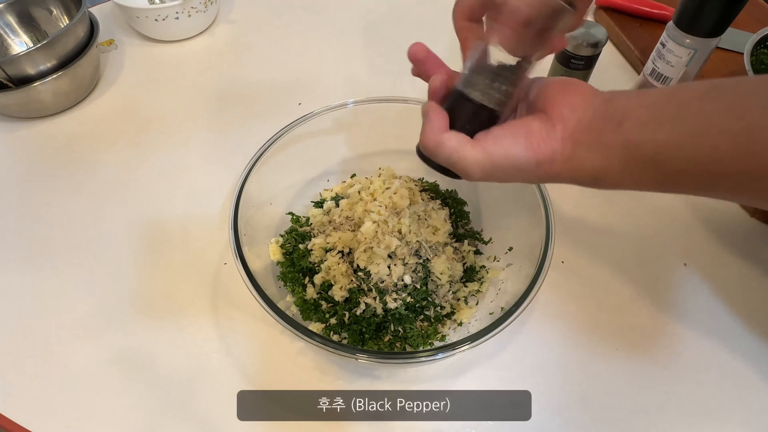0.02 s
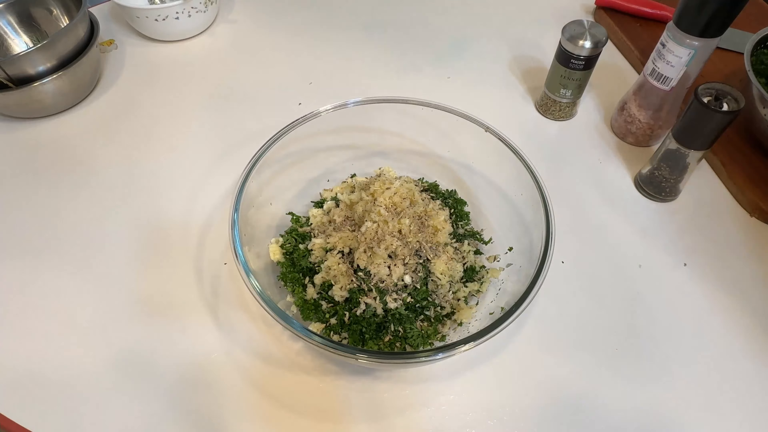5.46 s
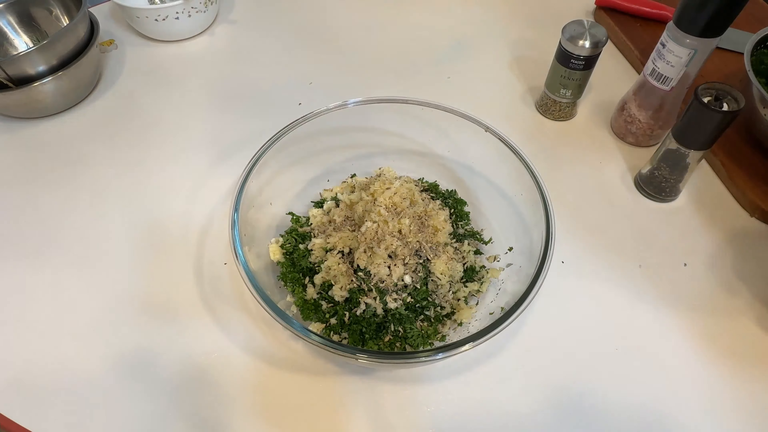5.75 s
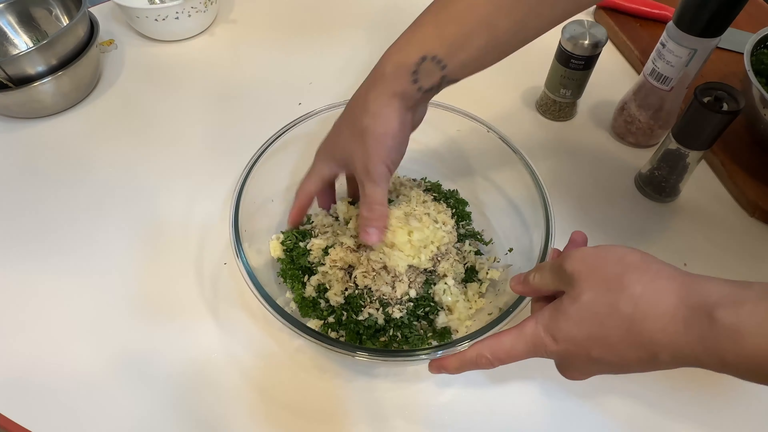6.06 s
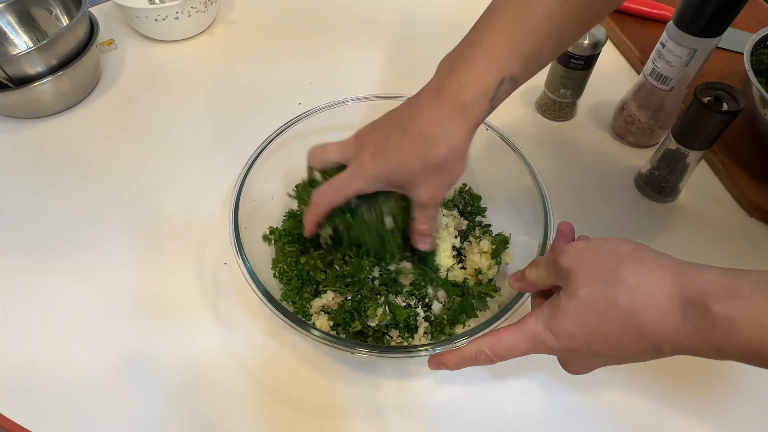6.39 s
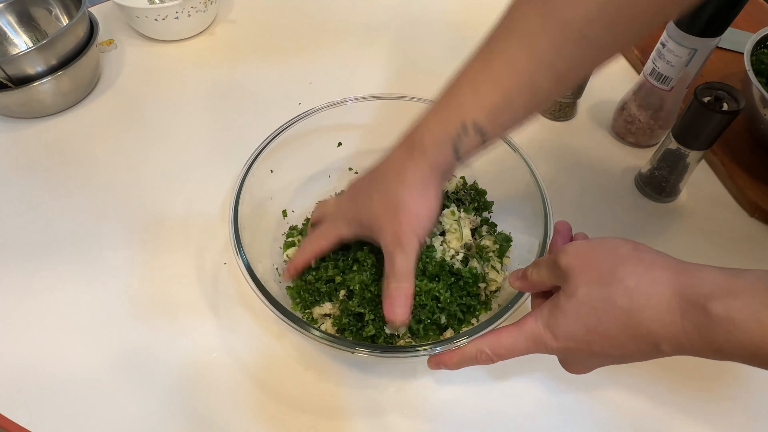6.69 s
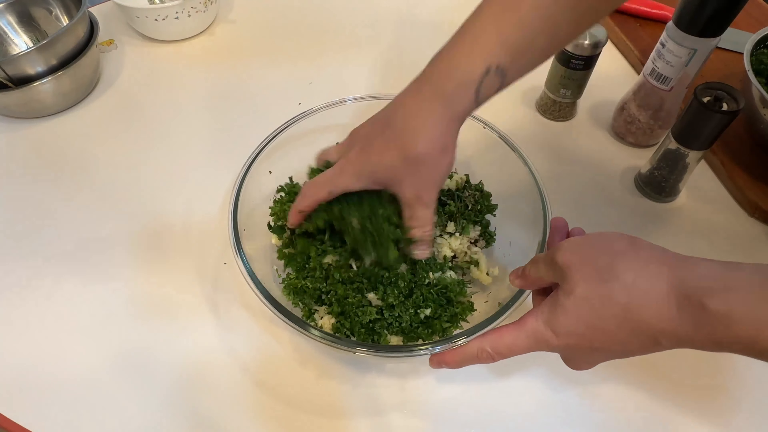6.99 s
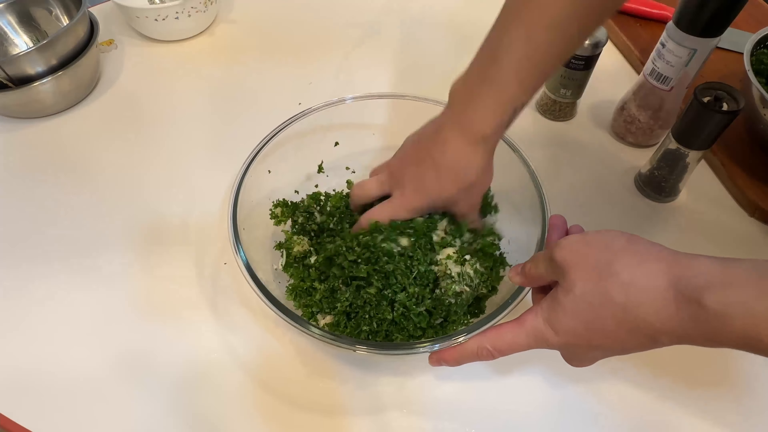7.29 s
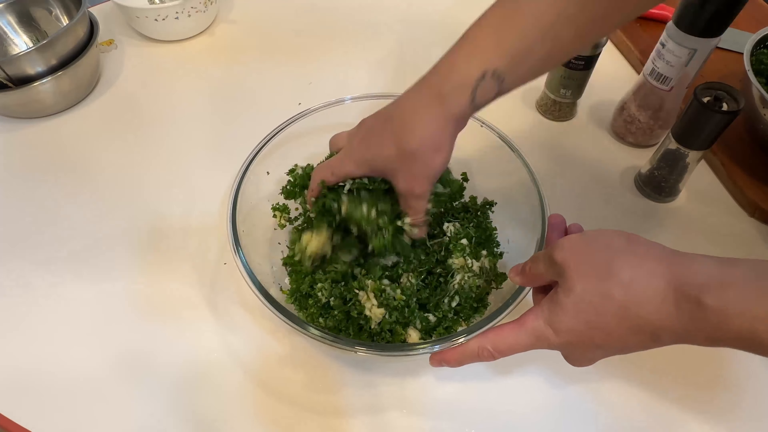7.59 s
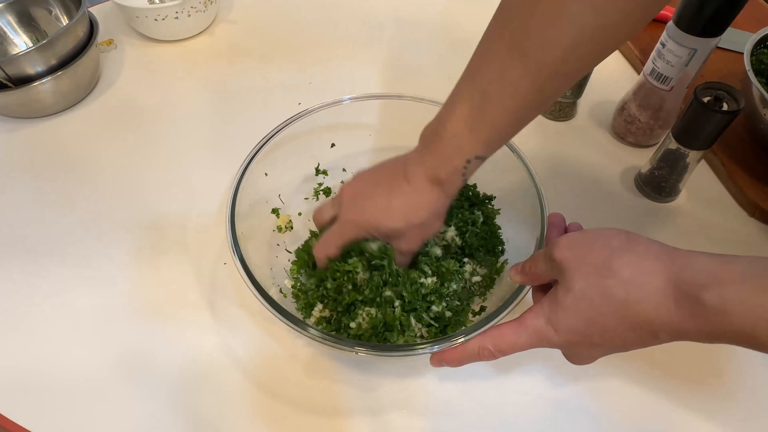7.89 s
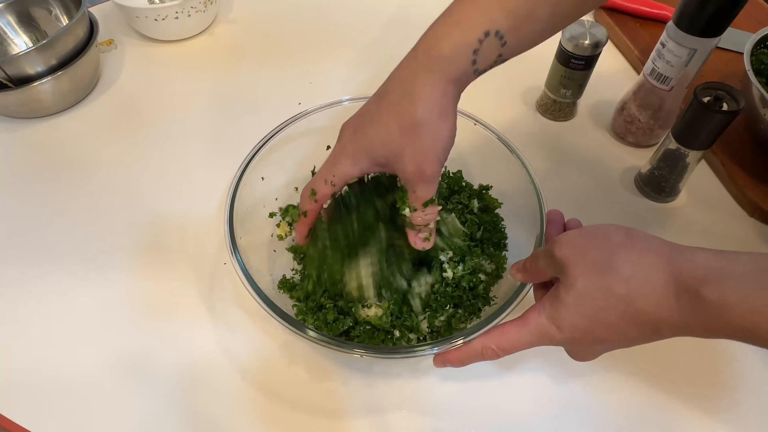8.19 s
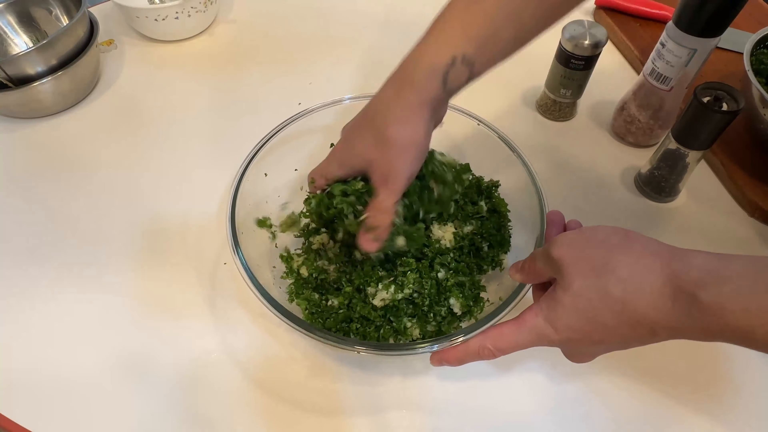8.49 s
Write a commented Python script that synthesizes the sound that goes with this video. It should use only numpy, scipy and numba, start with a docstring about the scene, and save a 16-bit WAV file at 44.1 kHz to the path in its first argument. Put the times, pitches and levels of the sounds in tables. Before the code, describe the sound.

Close to the microphone in a kitchen, a hand pepper mill is twisted rapidly to and fro, crunching and scraping with a high metallic ring. It stops about halfway and is set down with a dull knock. A glass bowl clinks lightly as a hand tosses chopped greens with a soft rustle. Dry crackles pop throughout over a low rumble and fine hiss.

```python
"""Pepper mill and salad in a kitchen

Close to a stereo microphone, a hand mill is twisted to and fro over a glass bowl, about nine times
a second: each twist crushes corns, the way back scrapes, and the burr rings high. The bowl clinks,
the mill is set down with a dull knock, then a hand tosses chopped greens in quick strokes.
All along, dead centre, dry crackles pop over a low rumble and a fine hiss, like a small fire."""
import sys
import numpy as np
from scipy import signal
from scipy.fft import rfft, irfft, next_fast_len
from scipy.io import wavfile
from scipy.ndimage import uniform_filter1d
from numba import njit

SR = 44100
rng = np.random.default_rng(int(sys.argv[2]) if len(sys.argv) > 2 else 0)


def write(x):
    x = np.atleast_2d(x).T
    wavfile.write(sys.argv[1], SR, np.round(np.clip(x, -1, 1) * 32767).astype(np.int16))


N = 384993
TIME = np.arange(N) / SR
BURR_HZ, TOP_HZ = 8530, 15850  # the burr's ring; the recorder's upper limit

# Levels are relative: each source adds its own gain.
# course of the room's rumble: t/s, level/dB
RUMBLE_LEVEL = [(0.0, -49), (6.0, -49.5), (6.75, -47.5), (7.15, -50.5), (8.73, -51)]
# spectra of the rumble and the hiss: f/Hz, level/dB
RUMBLE_SPECTRUM = [(20, -29), (45, -21), (65, -12.5), (88, 0), (125, -1.5), (180, -4), (250, -11),
                   (315, -10), (400, -17.5), (520, -18.5), (640, -24.5), (760, -22), (1300, -34.5),
                   (4000, -65)]
HISS_SPECTRUM = [(300, 4.5), (1500, 1), (5000, 2), (8000, 3), (11000, 4.8), (12900, 5.8), (13900, 7.8),
                 (16000, 5.5)]
# stereo width of room and mill at the microphone: f/Hz, side against mid/dB
ROOM_SIDE = [(25, 3), (90, -24), (250, -19.5), (1000, -16.5), (2500, -33.5)]
MILL_SIDE = [(150, 2), (500, 0), (9500, 0), (11500, -1.5), (16000, -1)]
# wrist strokes, each catching more or fewer corns: middle t/s, crunch/dB, scrape/dB
MILL_STROKES = [(0.067, -47.0, -44.5), (0.122, -45.5, -41.5), (0.184, -44, -46.5), (0.237, -44, -40.5),
                (0.285, -42.5, -48), (0.338, -46.5, -45), (0.384, -48, -46), (0.828, -67, -56),
                (0.897, -50, -40), (0.946, -49.5, -44), (1.001, -45.5, -53), (1.137, -44, -46.5),
                (1.197, -47, -41), (1.247, -44, -44), (1.302, -49, -40), (1.35, -43.5, -56),
                (1.406, -45.5, -44.5), (1.45, -42.5, -51), (1.512, -48.5, -41.5), (1.558, -42.5, -48),
                (1.613, -46, -41), (1.659, -41.5, -40.5), (1.717, -48.5, -39), (1.757, -43.5, -44.5),
                (1.81, -50.5, -42.5), (1.849, -45.5, -41), (1.912, -54.5, -53), (1.953, -40.5, -48),
                (2.009, -52, -47.5), (2.055, -41.5, -48), (2.108, -50, -46), (2.152, -42.5, -47),
                (2.208, -51, -43.5), (2.253, -44.5, -42), (2.316, -48.5, -40), (2.376, -47.5, -46),
                (2.433, -52.5, -46), (2.497, -47, -46.5), (2.554, -46.5, -46), (2.608, -45.5, -60),
                (2.661, -51, -42.5), (2.714, -44, -47), (2.771, -51, -46.5), (2.82, -46, -42.5),
                (2.872, -48, -46), (2.934, -46, -46), (2.992, -51, -46), (3.045, -43, -48.5),
                (3.097, -49, -47.5), (3.149, -44.5, -44.5), (3.21, -54, -47), (3.264, -40, -54),
                (3.323, -50, -47.5), (3.369, -47.5, -49), (3.44, -54, -51.5), (3.539, -48.5, -48),
                (3.603, -56.5, -52), (3.663, -43, -47), (3.716, -49.5, -49.5), (3.773, -45, -51),
                (3.834, -48, -46.5), (3.892, -44, -43), (3.946, -52.5, -47.5), (3.992, -46.0, -42),
                (4.05, -47.5, -49), (4.095, -42, -43), (4.152, -53.5, -44.5), (4.204, -43.5, -48.5),
                (4.258, -55.5, -48), (4.307, -45, -43.5), (4.372, -50, -49.5), (4.429, -44.5, -42.5),
                (4.52, -48.5, -47.5)]
# a hard corn gives way all at once: start t/s, length/s, crunch/dB, scrape/dB
CORN_BREAKS = [(0.99, 0.022, -46.5, -36), (2.364, 0.0066, -45, -51), (2.603, 0.0096, -46, -35),
               (3.036, 0.0058, -57, -42), (3.081, 0.0042, -43, -66), (3.757, 0.0037, -38, -42)]
# a hard corn squeaks as it yields: middle t/s, f/Hz, level/dB
CORN_SQUEAKS = [(1.135, 3200, -35.5), (1.132, 3980, -40), (1.968, 3000, -36), (2.253, 412, -34.5),
                (3.541, 3600, -36), (3.668, 3530, -39), (4.164, 6150, -41), (4.43, 4500, -37.5)]
# spectra of the crunch through the mill's body and of the burr's scrape: f/Hz, level/dB
CRUNCH_SPECTRUM = [(120, -2.5), (640, -1), (950, 2), (1300, -3.5), (2200, -0.5), (2700, -2.5), (3450, -4),
                   (3900, -4.5), (5200, -9.5), (8000, -2.5), (16000, -16)]
SCRAPE_SPECTRUM = [(2500, -37), (5000, -8.5), (6500, -2.5), (8000, 3.5), (8600, 7), (9600, 5), (10500, -6),
                   (11800, -15), (14000, -5), (16000, -20)]
# how freely the burr rings as the grip shifts: t/s, level/dB
BURR_FREEDOM = [(0.2, -1), (1.4, 2), (1.85, 1.5), (2.4, -1), (3.05, 3.5), (3.55, -1.5), (4.1, 1.5)]
# the burr turns empty: middle t/s, length/s, level/dB
EMPTY_TURNS = [(.5, 0.056, -63), (4.575, 0.06, -58.5), (4.685, 0.035, -56.5)]
# the clearest dry crackles: t/s, level/dB, snap f/Hz, sputter against snap/dB
CRACKLES = [(0.131, -23, 8400, -8), (0.7333, -21, 9340, -11.5), (1.11, -26.5, 13400, -1),
            (1.6976, -29.5, 9500, -6), (1.706, -40, 9500, -6), (3.216, -34.5, 8700, 2),
            (3.7535, -31, 8400, 2), (3.9848, -31, 11300, -5), (4.182, -29.5, 9800, 12),
            (4.4793, -23.5, 6460, -17), (4.4806, -24, 11700, 4), (4.629, -33.5, 10600, -13),
            (4.725, -29.5, 13900, -6), (4.822, -38.5, 9300, 13), (4.8666, -33.5, 9300, -1),
            (5.09, -42, 6900, 5), (5.189, -30.5, 12300, -6), (5.3282, -29.5, 9500, -12),
            (5.367, -23, 10400, -1), (5.389, -37, 9500, 11), (5.517, -34.5, 11400, 3),
            (5.6357, -35.5, 13100, -3), (5.7785, -33.5, 10900, -3), (5.806, -36.5, 12300, 4),
            (5.847, -34, 8700, -1), (5.895, -43, 6050, 6), (6.044, -28.5, 12000, -5.5),
            (6.142, -36, 11500, -9), (6.3813, -38, 9700, 11), (6.764, -41, 11700, -2),
            (6.7742, -41, 11000, 6), (6.883, -39.5, 14000, -1), (6.904, -34, 10100, 0),
            (6.958, -31, 13200, 0), (7.055, -41.5, 11000, 6), (7.128, -34.5, 7900, 2),
            (7.2762, -37, 10800, -4), (7.364, -39.5, 11200, 7), (7.5436, -28.5, 13300, -5),
            (7.656, -41, 9400, 8), (7.666, -47, 8200, -1), (7.709, -48, 4840, 1), (8.036, -31.5, 13400, 2),
            (8.455, -41.5, 9700, 8)]
# hollow ring under each snap: f/Hz, level/dB, t60/s
CRACKLE_MODES = [(2370, -22.5, 0.018), (3700, -24, 0.012), (5700, -14.5, 0.0035)]
# clinks of the glass bowl: t/s, f/Hz, level/dB, t60/s
BOWL_CLINKS = [(4.867, 3600, -29.5, 0.0063), (5.367, 2180, -36, 0.022), (5.847, 5260, -30, 0.0057),
               (6.905, 5260, -31.5, 0.0059), (7.13, 5630, -34, 0.0046), (7.367, 3620, -35, 0.011)]
# the mill meets the worktop: t/s, level/dB, upper edge of the blow f/Hz
WORKTOP_KNOCKS = [(4.876, -40.5, 985), (4.882, -35.5, 855), (4.919, -31.5, 476)]
# modes of the worktop: f/Hz, level/dB, t60/s
WORKTOP_MODES = [(142, -2, 0.055), (459, -3.5, 0.12), (576, 14, 0.025), (750, 6.5, 0.072),
                 (970, 9.5, 0.028), (1260, 7, 0.048)]
# soft low bumps: middle t/s, length/s, level/dB, f/Hz
LOW_BUMPS = [(5.267, 0.027, -42, 148.6), (6.78, 0.031, -43, 105.2), (7.902, 0.026, -49, 52),
             (8.635, 0.03, -51, 48.7)]
# the hand tosses the leaves about five times a second: middle t/s, level/dB
TOSSES = [(5.84, -83), (6.15, -59.5), (6.379, -56), (6.58, -59.5), (6.79, -57.5), (6.988, -54.5),
          (7.17, -58), (7.375, -58.5), (7.58, -58.5), (7.775, -56), (7.92, -57.5), (8.145, -57.5),
          (8.335, -59), (8.485, -56), (8.641, -57)]
# spectrum of the leaves rustling in the bowl: f/Hz, level/dB
LEAF_SPECTRUM = [(30, 12), (130, 3.5), (300, 9), (600, -4.5), (1500, -0.5), (3000, 3), (4500, -1),
                 (7500, 2), (9700, 4.5), (11300, -4), (16000, -12)]


def undb(db):
    """Decibels to gain."""
    return 10 ** (np.asarray(db) / 20)


def unit(x):
    """Scale to rms 1."""
    return x / np.sqrt(np.mean(x ** 2))


def colour(x, points, normal=True):
    """Filter by a curve of f/Hz, level/dB; if normal, white noise keeps its power."""
    size = next_fast_len(N + 4096)
    hz, db = np.transpose(points)
    bin_hz = np.arange(size // 2 + 1) * SR / size
    gain = undb(np.interp(np.log(bin_hz + 1), np.log(hz), db))
    return irfft(rfft(x, size) * (unit(gain) if normal else gain), size)[..., :N]


def spread(mid, side, width):
    """Left and right from a mid and a side signal."""
    side = colour(side, width, normal=False)
    return np.array([mid + side, mid - side])


def add(track, s, sound):
    """Mix a short sound in at s seconds."""
    start = max(int(s * SR), 0)
    track[..., start:start + sound.shape[-1]] += sound[..., :N - start]


def walk(rate):
    """Random wander, spread near 1, with rate turning points a second."""
    knots = rng.standard_normal(16384)
    return 1.2 * np.interp(TIME * rate, np.arange(len(knots)), knots)


def swells(rows):
    """Amplitude of bell-shaped pushes: middle t/s, length/s, level/dB."""
    power = np.zeros(N)
    for s, length, db in rows:
        near = slice(max(int((s - 2 * length) * SR), 0), int((s + 2 * length) * SR))
        power[near] += undb(db) ** 2 * np.exp(-np.pi * ((TIME[near] - s) / length) ** 2)
    return np.sqrt(power)


def bursts(rows, attack_s=0.0011, release_s=0.0027):
    """Amplitude of sudden pushes that hold, then let go: start t/s, length/s, level/dB."""
    out, t = np.zeros(N), TIME[:4096]
    for s, length, db in rows:
        release = np.exp(-np.maximum(t - length, 0) / release_s)
        add(out, s, undb(db) * np.minimum(t / attack_s, 1) * release)
    return out


@njit
def ping(at, hz, size, cycles):
    """Damped sines that start at the given samples and fall 40 dB in the given cycles."""
    out = np.zeros(N)
    for k in range(len(at)):
        length = int(cycles * SR / hz[k]) + 2
        phasor = size[k] + 0j
        step = np.exp(2j * np.pi * hz[k] / SR - np.log(100.) / length)
        for i in range(at[k], min(at[k] + length, N)):
            phasor *= step
            out[i] += phasor.imag
    return out


def cracks(rate, scatter_db, cycles, low_hz=60):
    """Tiny fractures at random moments, each with its own pitch, most small, a few large; rms 1."""
    when, pitch, luck, sign = rng.random((int(rate * N / SR), 4)).T
    hz = low_hz + 16000 * pitch ** 2
    # high grains are short, so they are made larger to hold as much power
    size = undb(-scatter_db * np.log(luck + .01)) * hz ** .75 * np.sign(sign - .5)
    return unit(ping((when * N).astype(np.int64), hz, size, float(cycles)))


def smear(x, t60):
    """Scatter a sound over a short dense decay, keeping its power."""
    t = TIME[:SR // 3]
    tail = rng.standard_normal(len(t)) * 1000 ** (-t / t60)
    return signal.oaconvolve(x, tail / np.linalg.norm(tail))[:N]


def ring(hz, t60, count=8192):
    """One struck mode, count samples long."""
    t = TIME[:count]
    return np.sin(2 * np.pi * hz * t) * 1000 ** (-t / t60)


def resonate(drive, hz, t60):
    """One mode rings under a noisy drive."""
    mode = ring(hz, t60)
    return signal.oaconvolve(drive, mode / np.linalg.norm(mode))[:N]


def room_tone(hiss_db=-57.5, flutter_db=1.52):
    """A low fluttering rumble and a fine even hiss, nearly the same left and right."""
    level = undb(np.interp(TIME, *np.transpose(RUMBLE_LEVEL)) + flutter_db * walk(rate=12))
    rumble = level * colour(rng.standard_normal((2, N)), RUMBLE_SPECTRUM)
    hiss = undb(hiss_db) * colour(rng.standard_normal((2, N)), HISS_SPECTRUM)
    mid, side = rumble + hiss
    return spread(mid, side, ROOM_SIDE)


def corn_crunch(crush, jerks, load, splinter_db=-8.5):
    """Shells break in a cloud of ringing cracks; lone splinters also snap between strokes."""
    shells = cracks(rate=3400, scatter_db=2.0, cycles=40, low_hz=200) * crush * jerks
    splinters = cracks(rate=90, scatter_db=2.5, cycles=6, low_hz=900) * load
    return colour(shells + undb(splinter_db) * splinters, CRUNCH_SPECTRUM)


def barrel_ring(crush, wander_db=3.6):
    """The mill's hollow barrel rings with the crunch."""
    drive = rng.standard_normal(N) * crush * unit(undb(wander_db * walk(rate=18)))
    return resonate(drive, hz=3090, t60=0.008)


def burr_scrape(grit, lean_db=1.8):
    """The burr scrapes; the changing grip leans the sound below or above the burr's pitch."""
    scrape = colour(grit, SCRAPE_SPECTRUM)
    below = signal.sosfiltfilt(signal.butter(6, BURR_HZ, fs=SR, output="sos"), scrape)
    tilt = undb(lean_db * walk(rate=25))
    return below * tilt + (scrape - below) / tilt


def corn_squeaks(length_s=0.0072, wobble=0.05):
    """Hard corns give way with a brief tone of unsteady pitch."""
    out = np.zeros(N)
    for s, hz, db in CORN_SQUEAKS:
        pitch = hz * (1 + wobble * walk(rate=1100))
        out += swells([(s, length_s, db)]) * np.sin(2 * np.pi * np.cumsum(pitch) / SR)
    return out


def pepper_mill(crush_s=0.018, scrape_s=0.015, crumbs_db=-18, grip_db=1.8, jerk_db=2.2,
                crunch_db=-2, barrel_db=-9.5, scrape_db=-2.5, burr_db=-5, squeak_db=-3,
                room_db=-14, pan_db=0.48):
    """Close and wide, a touch right: each stroke breaks corns, sounds the barrel, scrapes the burr."""
    crush = swells([(s, crush_s, db) for s, db, _ in MILL_STROKES])
    crush += bursts([(s, length, db) for s, length, db, _ in CORN_BREAKS])
    load = uniform_filter1d(crush, size=3000)
    crush += undb(crumbs_db) * load  # crumbs go on grinding between strokes
    sliding = swells([(s, scrape_s, db) for s, _, db in MILL_STROKES])
    scraping = sliding + bursts([(s, length, db) for s, length, _, db in CORN_BREAKS])
    # the steel keeps rubbing through the turn of the wrist, so it sings on between strokes
    rubbing = np.sqrt(np.abs(uniform_filter1d(sliding ** 2 + crush ** 2 / 10, size=3000)))
    freedom = unit(undb(np.interp(TIME, *np.transpose(BURR_FREEDOM)) + grip_db * walk(rate=9)))
    singing = undb(burr_db) * rubbing * freedom + swells(EMPTY_TURNS)
    jerks = unit(undb(jerk_db * walk(rate=170)))  # the corn gives way in jerks
    paths = []
    # the sound leaves the mill by many paths, so mid and side are unrelated
    for _ in range(2):
        crunch = undb(crunch_db) * corn_crunch(crush, jerks, load)
        barrel = undb(barrel_db) * barrel_ring(crush)
        grit, friction = (cracks(rate=6000, scatter_db=4.0, cycles=250, low_hz=2037) * jerks
                          for _ in range(2))
        burr = resonate(friction * singing, BURR_HZ, t60=0.018)
        squeaks = undb(squeak_db) * corn_squeaks()
        scrape = undb(scrape_db) * burr_scrape(grit * scraping)
        direct = crunch + barrel + scrape + burr + squeaks
        paths.append(direct + undb(room_db) * smear(direct, t60=0.13))
    return spread(*paths, MILL_SIDE) * undb([[-pan_db], [pan_db]])


def crackle(hz, sputter_db, usual_hz=10300, click_db=-12, detune=0.12, count=2048):
    """One dry pop: a snap of a few cycles with a short sputter and a lower hollow ring."""
    t = TIME[:count]
    snap = unit(ring(min(hz, TOP_HZ), t60=0.0009, count=count) * np.sqrt(t))  # swells at first
    click = undb(click_db) * unit(ring(2200, t60=0.000083, count=count))
    # the sputter is made of briefer snaps, nearer the usual pitch
    drive = rng.standard_normal(count) * 1000 ** (-t / 0.039) * (1 - np.exp(-t / 0.001))
    brief_snap = ring(np.sqrt(hz * usual_hz), t60=0.00035, count=count)
    sputter = undb(sputter_db) * unit(signal.fftconvolve(drive, brief_snap)[:count])
    hollow = sum(undb(db) * unit(ring(mode_hz * (1 + detune * rng.standard_normal()), t60, count))
                 for mode_hz, db, t60 in CRACKLE_MODES)
    # a clean snap or a fine, high one hardly stirs the ring
    octaves_up = np.log2(max(hz / usual_hz, 1))
    hollow_db = min(sputter_db, 0) / 2 - 18 * octaves_up
    return unit(unit(snap + click) + sputter) + undb(hollow_db) * hollow


def crackling(gain_db=1, decay_db=-17, patter_db=-69):
    """Dead centre: clear crackles with a faint decay, and tiny ones pattering in between."""
    pops = np.zeros(N)
    for s, db, hz, sputter_db in CRACKLES:
        pop = crackle(hz, sputter_db)
        length_ms = 1000 * len(pop) / SR  # the level counts the pop's energy as if packed into 1 ms
        add(pops, s, undb(db + gain_db) * pop / np.sqrt(length_ms))
    patter = cracks(rate=20, scatter_db=2.4, cycles=3, low_hz=5000)
    patter += smear(patter, t60=0.037)
    return pops + undb(decay_db) * smear(pops, t60=0.5) + undb(patter_db) * patter


def bowl_clinks():
    """The full bowl rings briefly, damped by the leaves."""
    out = np.zeros(N)
    for s, hz, db, t60 in BOWL_CLINKS:
        add(out, s, undb(db) * ring(hz, t60))
    return out


def worktop_knocks(gain_db=3, room_db=-2, attack_s=0.0029):
    """Padded blows ring the worktop and spread through the room; softer ones leave only low modes."""
    mid = np.zeros(N)
    for s, db, edge_hz in WORKTOP_KNOCKS:
        blow = sum(undb(mode_db) / (1 + (hz / edge_hz) ** 6) * ring(hz, t60)
                   for hz, mode_db, t60 in WORKTOP_MODES)
        attack = 1 - np.exp(-TIME[:len(blow)] / attack_s)
        add(mid, s, undb(db + gain_db) * blow * attack)
    side = undb(room_db) * smear(mid, t60=0.084)
    return np.array([mid + side, mid - side])


def low_bumps():
    """Soft bumps in the centre, each a short swell of one low tone."""
    return sum(swells([(s, length, db)]) * np.sin(2 * np.pi * hz * TIME)
               for s, length, db, hz in LOW_BUMPS)


def tossed_leaves(stroke_s=0.063, rustle_db=0.8, side_db=-1, stems_db=-15):
    """Leaves rub past each other and jostle the bowl; small wet stems snap while the hand moves."""
    motion = swells([(s, stroke_s, db) for s, db in TOSSES])
    mid, side = (colour(cracks(rate=2800, scatter_db=3.0, cycles=12) * motion, LEAF_SPECTRUM)
                 for _ in range(2))
    rustle = mid + undb(side_db) * np.array([side, -side])
    stems = cracks(rate=70, scatter_db=2, cycles=3, low_hz=2200)
    stems = (stems + smear(stems, t60=0.027)) * uniform_filter1d(motion, size=8000)
    return undb(rustle_db) * rustle + undb(stems_db) * stems


def scene():
    """The kitchen as it reaches the microphone."""
    return (room_tone() + pepper_mill() + crackling() + bowl_clinks()
            + worktop_knocks() + low_bumps() + tossed_leaves())


def record(dry):
    """The recorder cuts the top steeply."""
    return signal.sosfilt(signal.ellip(10, .2, 70, TOP_HZ, fs=SR, output="sos"), dry)


dry = scene()
out = record(dry)
write(out)
```